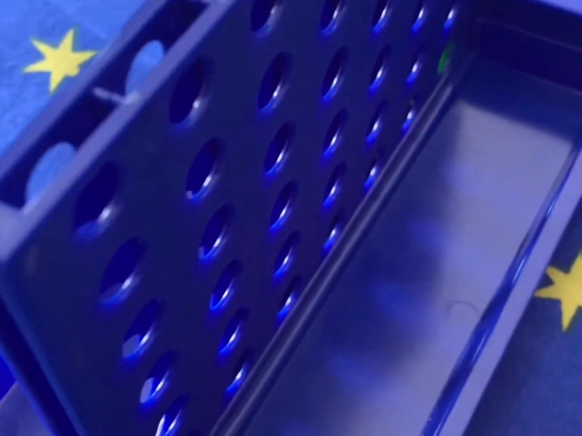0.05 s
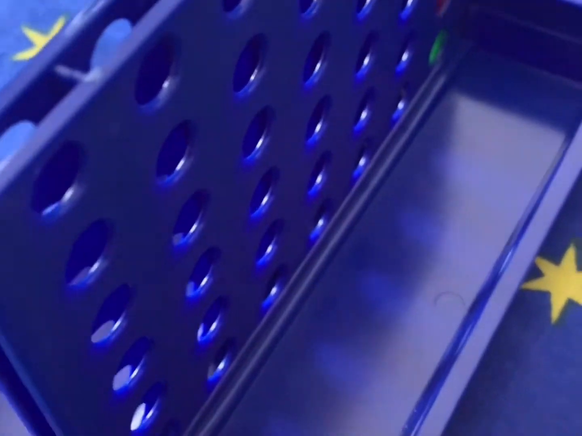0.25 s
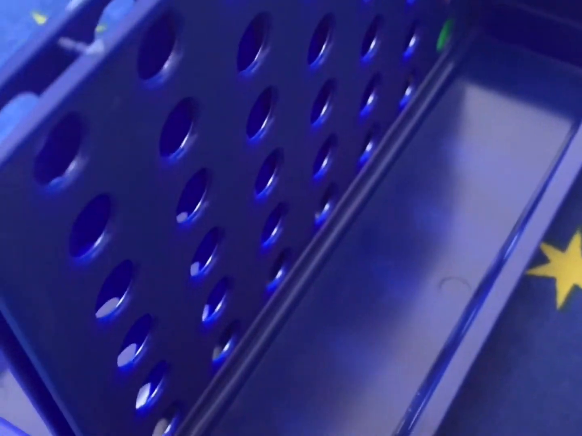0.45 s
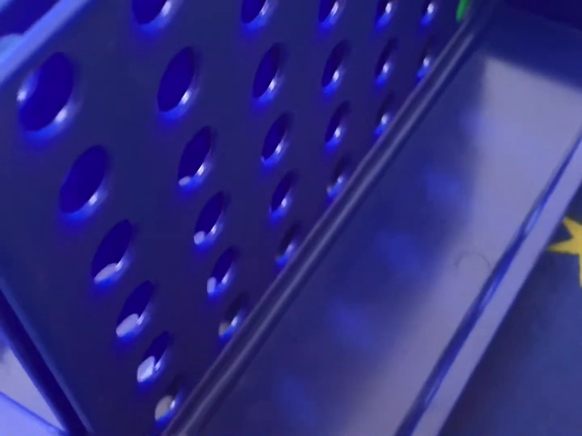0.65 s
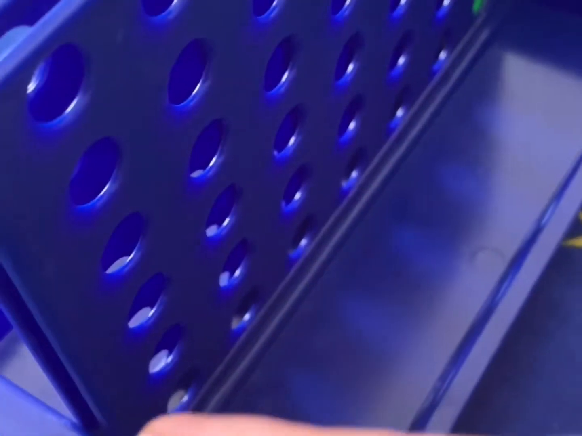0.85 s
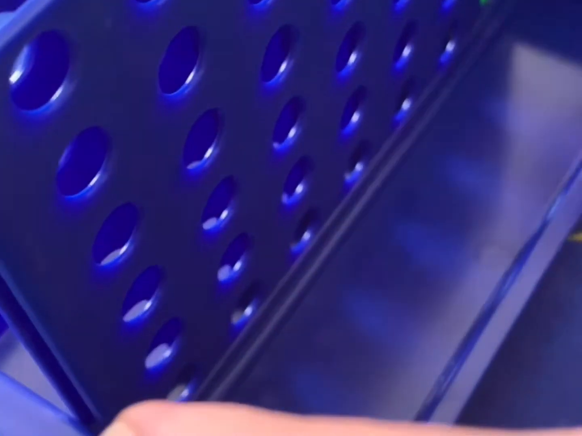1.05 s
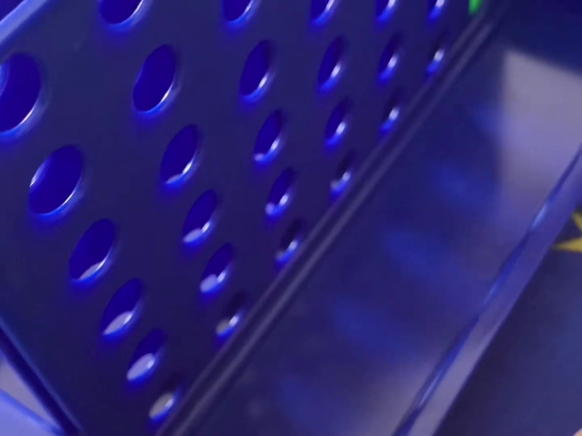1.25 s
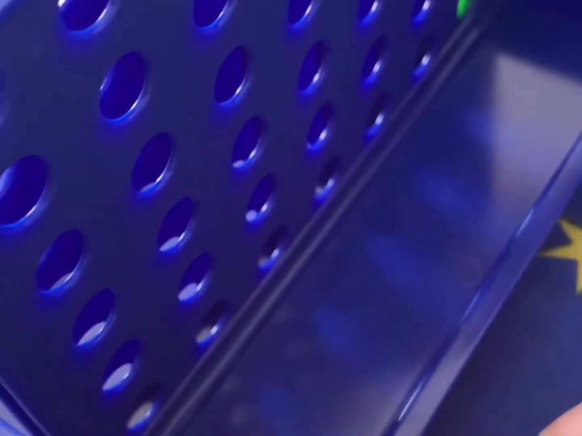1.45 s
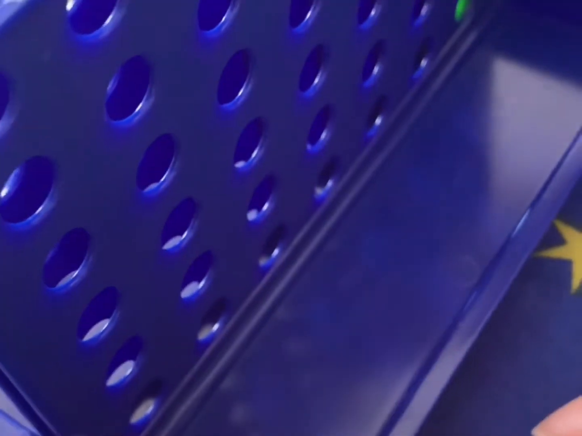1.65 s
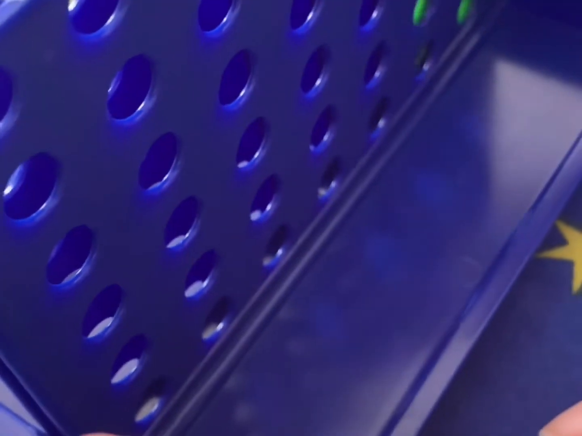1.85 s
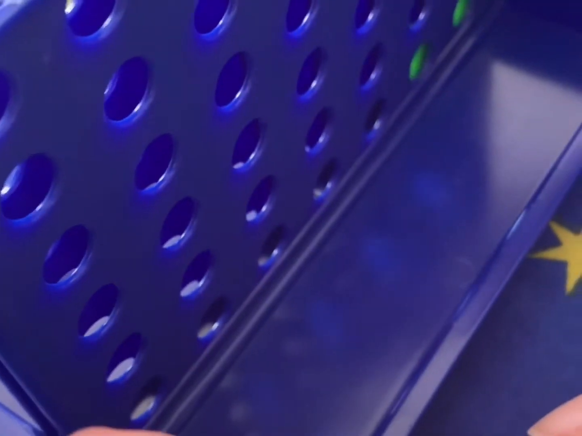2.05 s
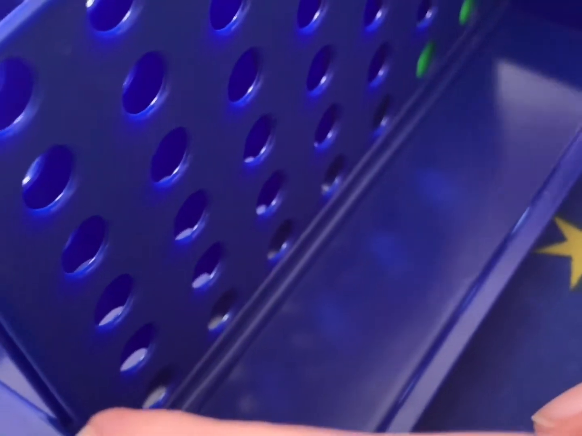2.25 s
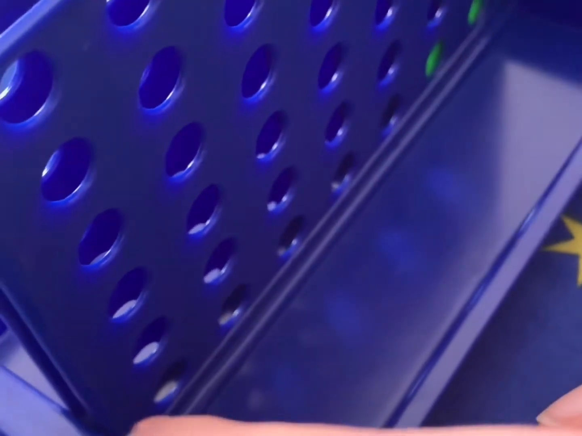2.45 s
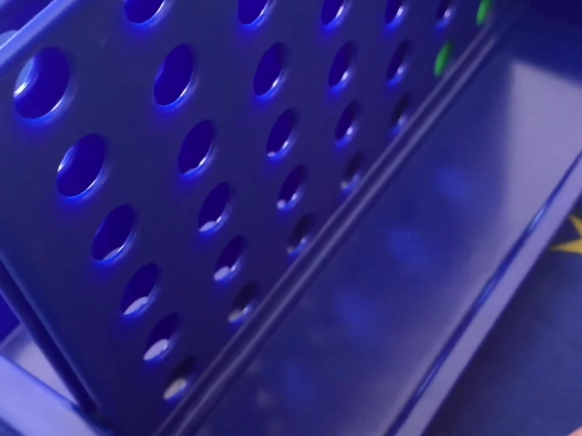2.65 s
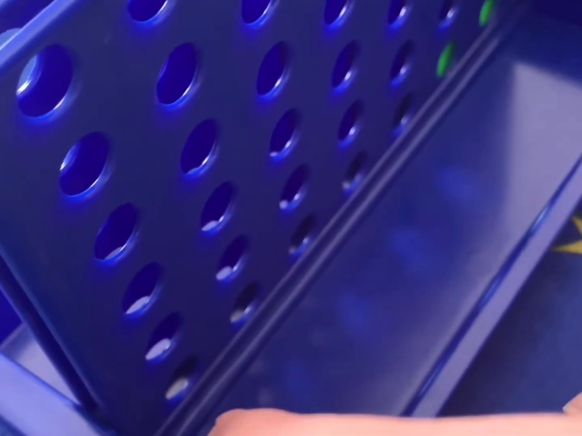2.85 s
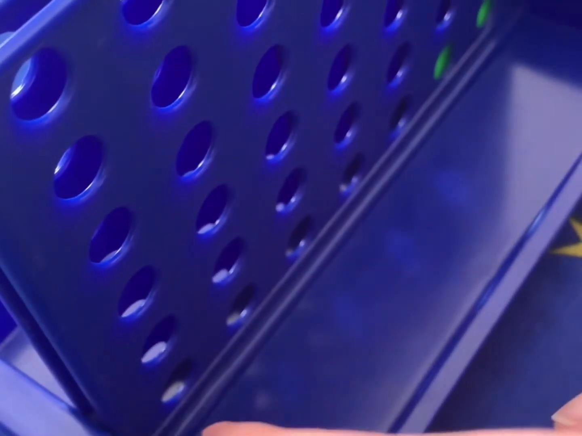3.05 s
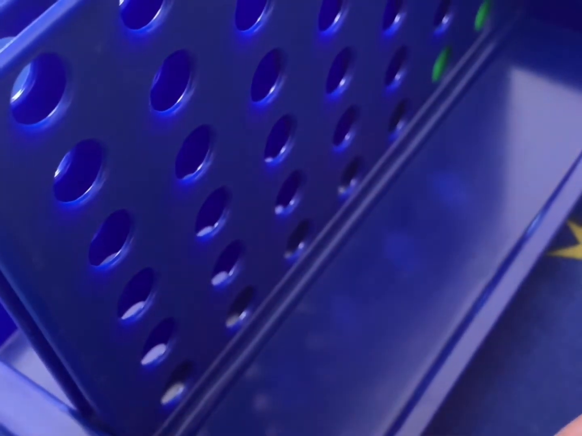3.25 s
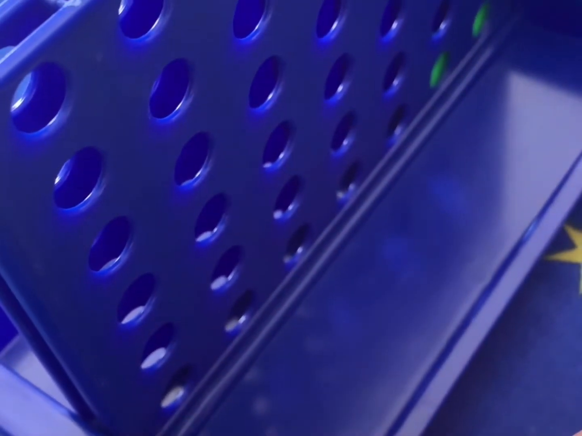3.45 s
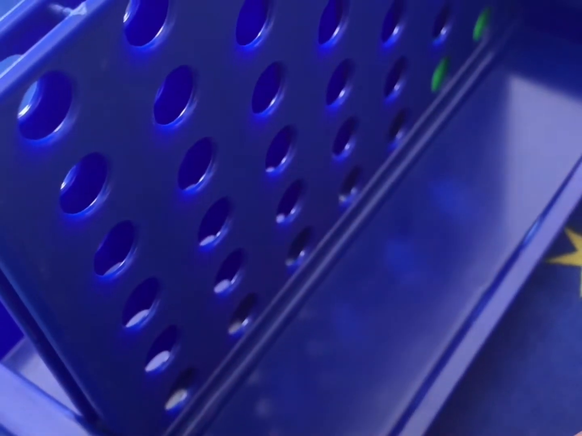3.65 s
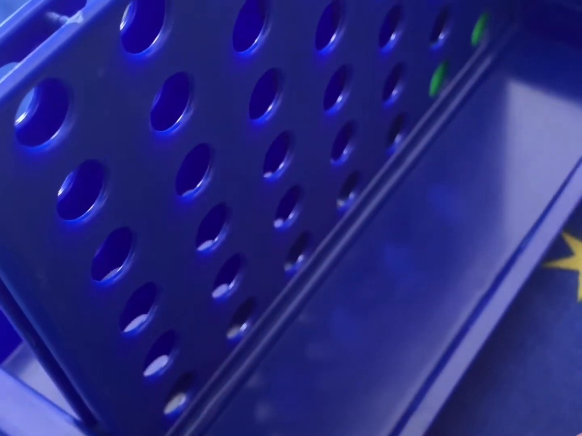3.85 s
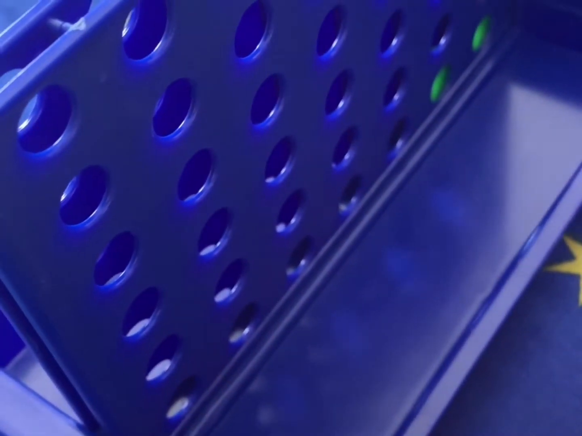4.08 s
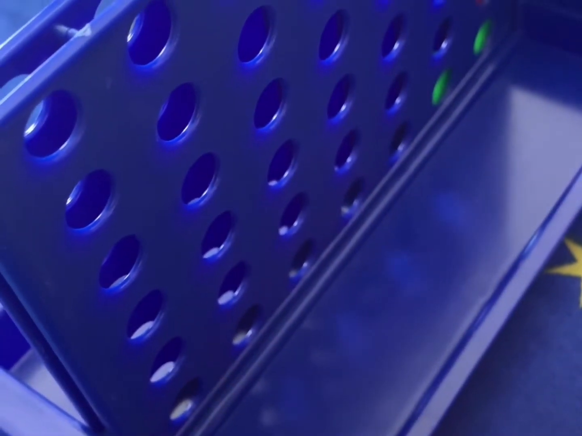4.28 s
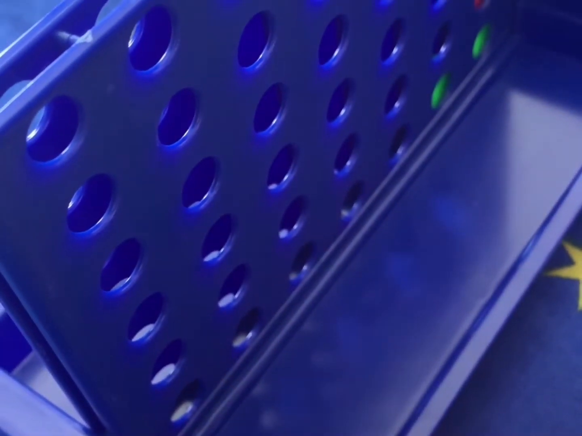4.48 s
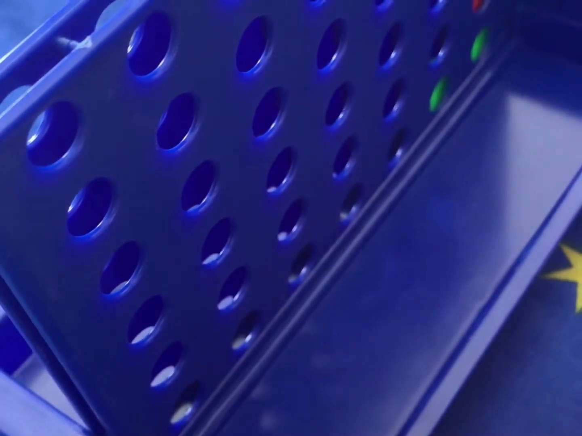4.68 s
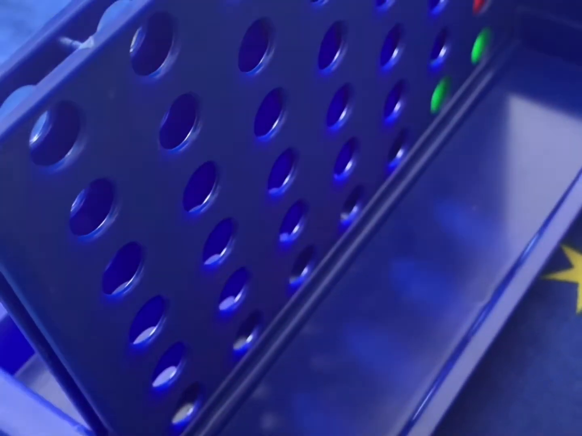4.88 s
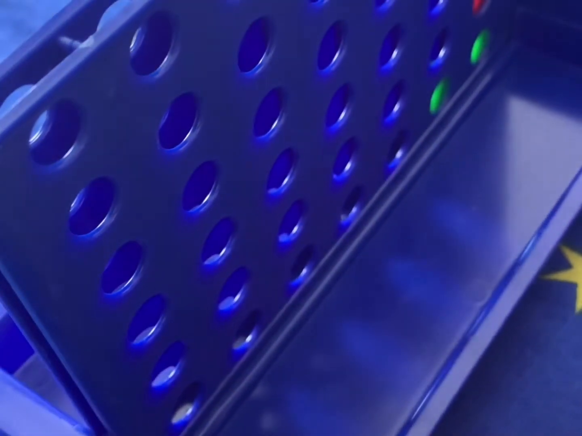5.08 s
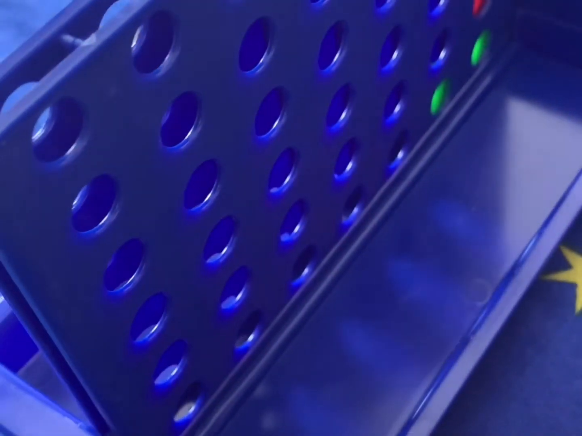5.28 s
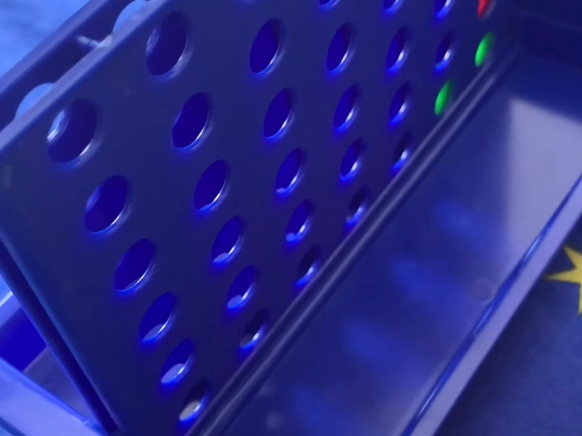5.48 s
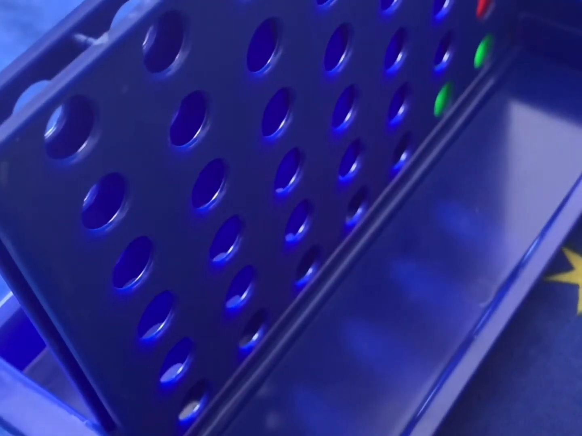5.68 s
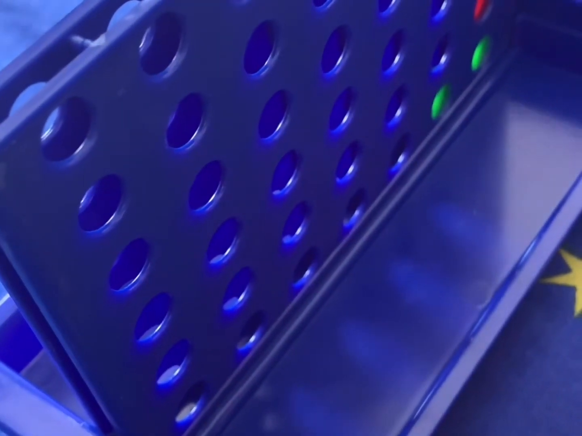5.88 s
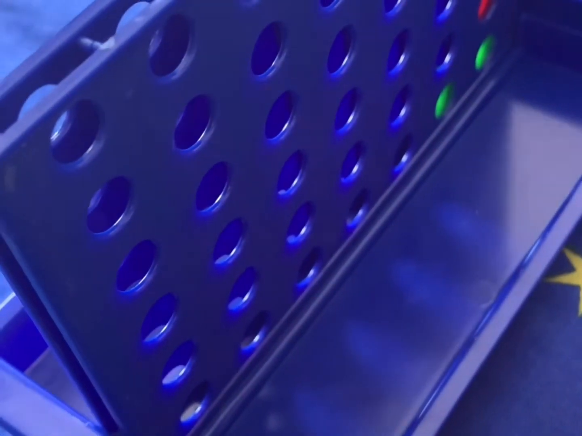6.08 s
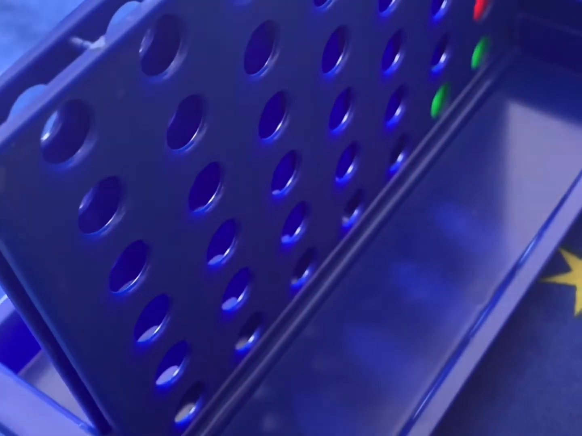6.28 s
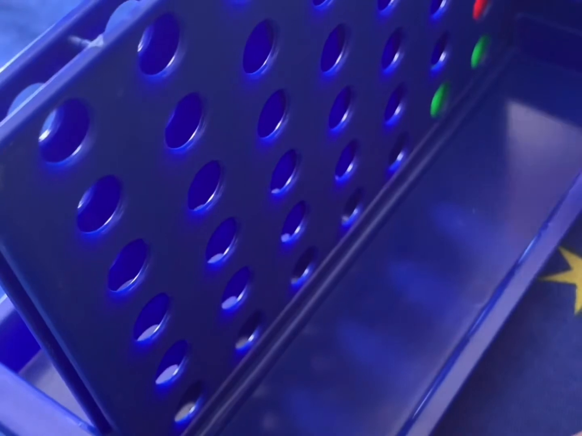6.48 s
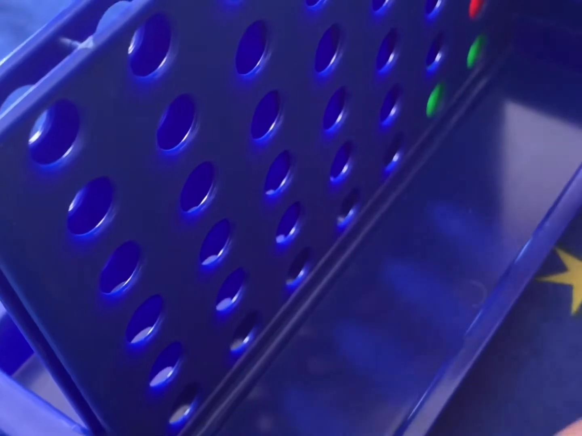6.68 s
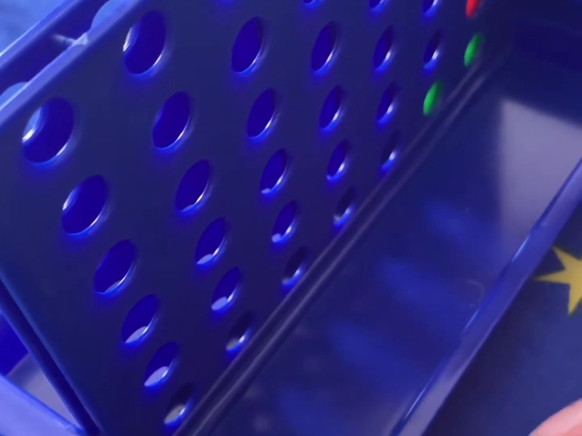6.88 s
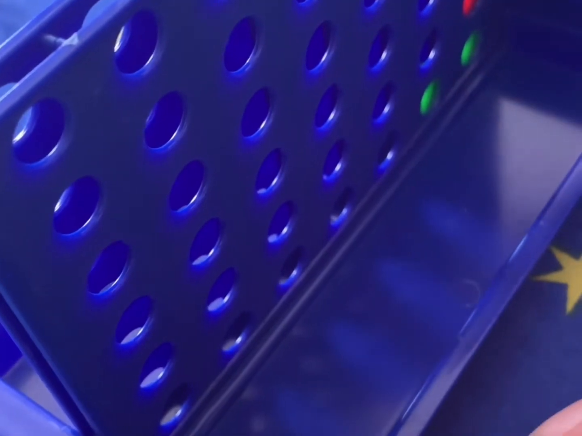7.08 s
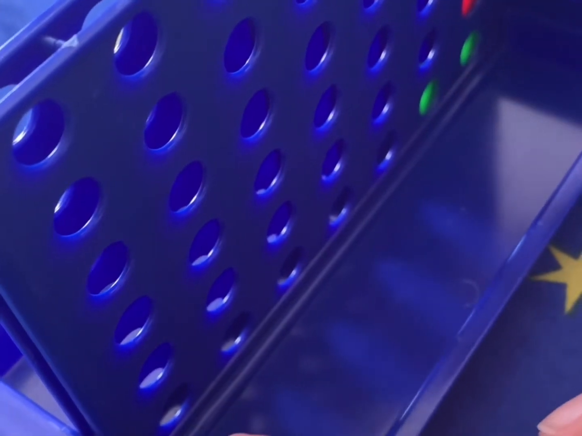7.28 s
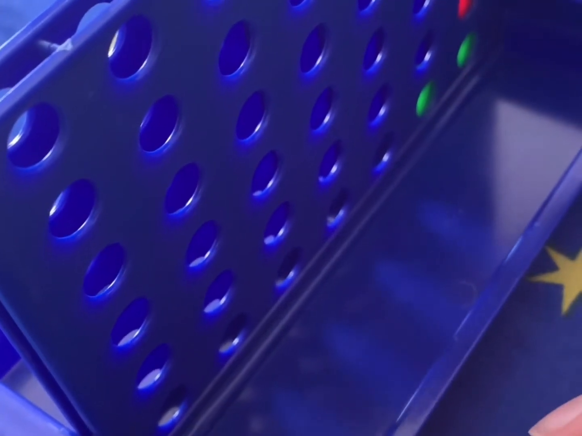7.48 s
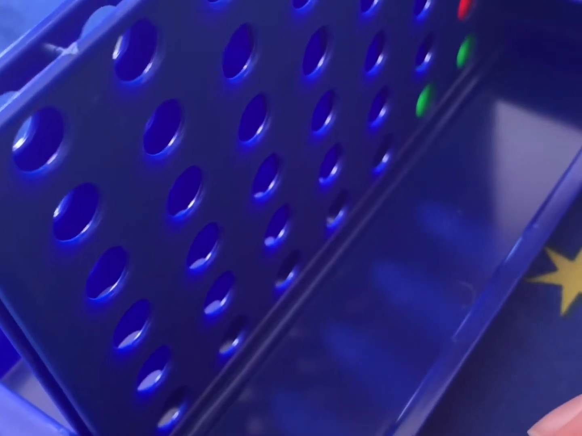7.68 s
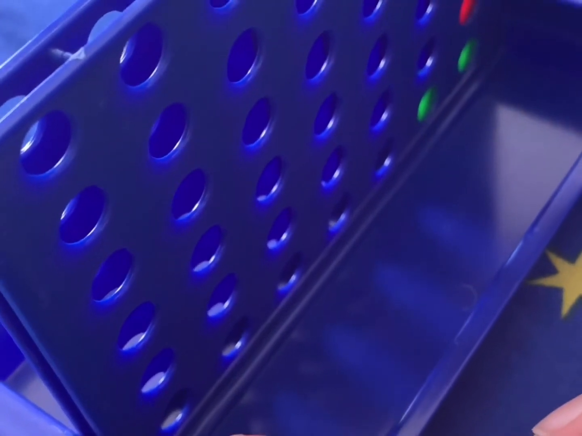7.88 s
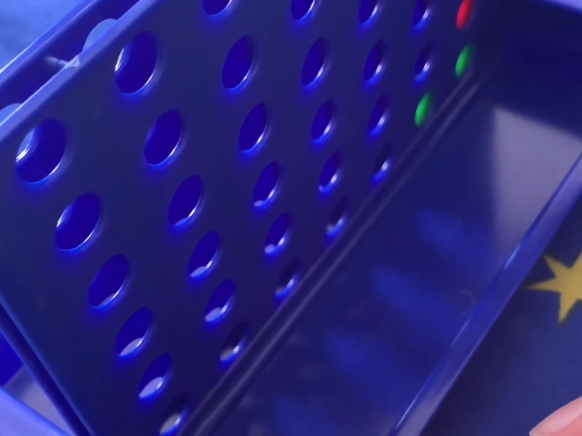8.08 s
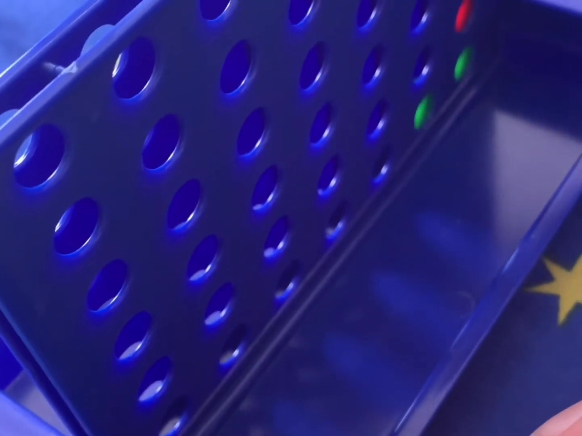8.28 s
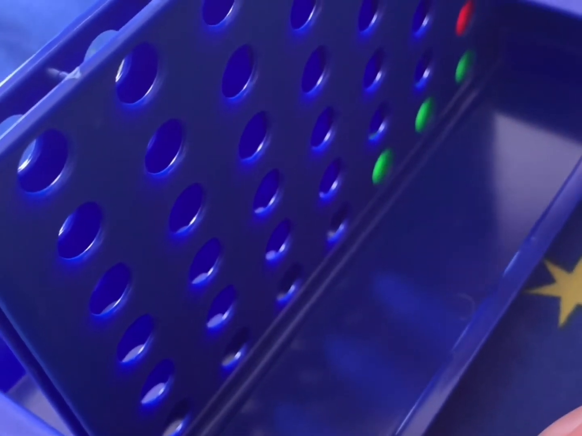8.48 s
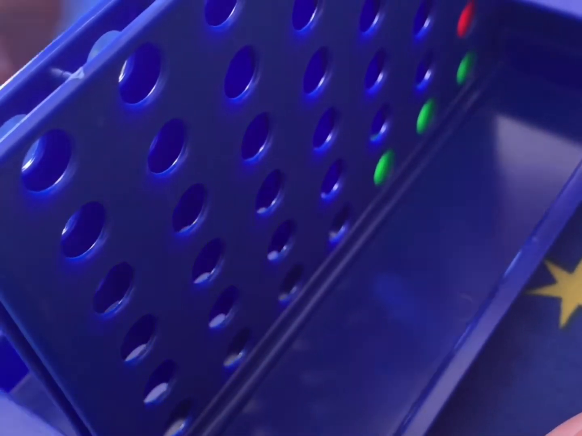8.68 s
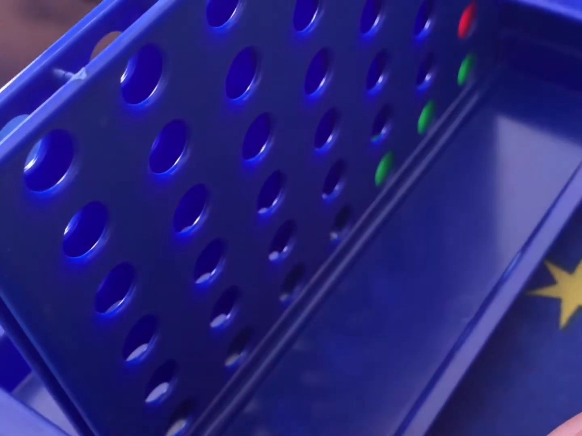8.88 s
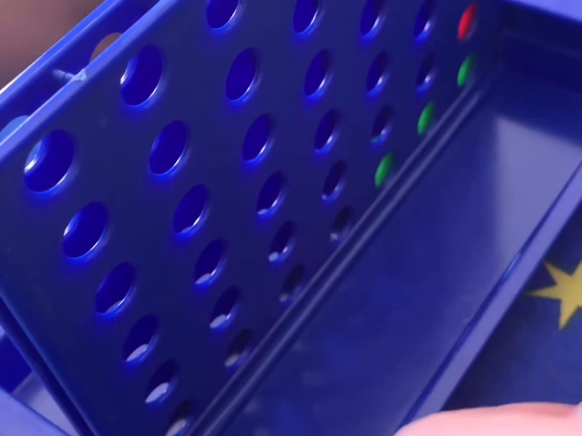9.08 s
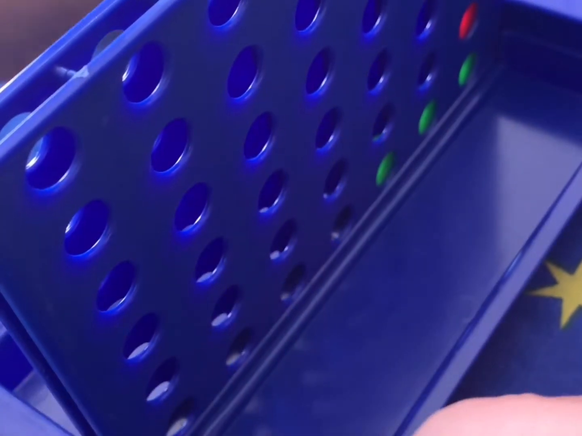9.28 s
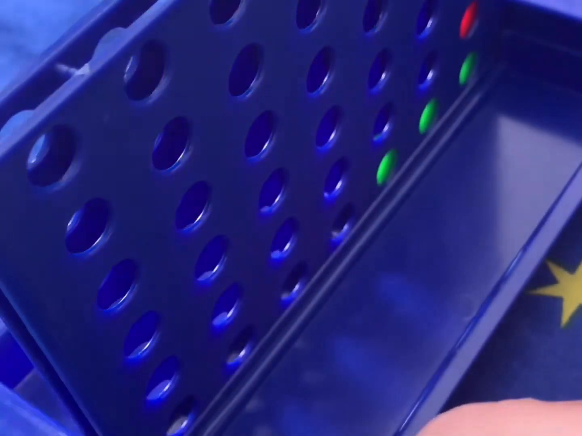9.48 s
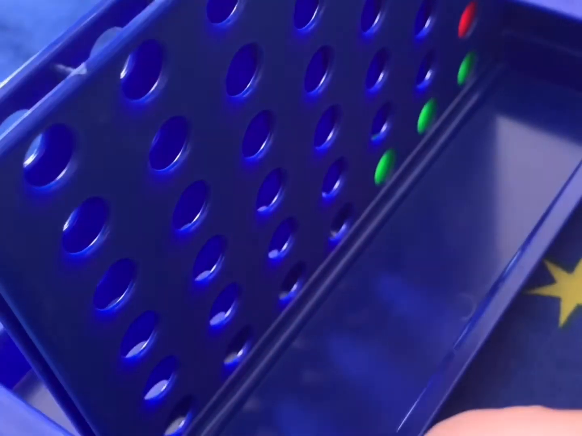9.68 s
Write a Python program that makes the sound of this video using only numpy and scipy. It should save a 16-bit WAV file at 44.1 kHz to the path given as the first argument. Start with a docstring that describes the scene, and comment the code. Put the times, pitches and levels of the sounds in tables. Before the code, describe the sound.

Very close in a small, soft room, light plastic discs drop into an upright plastic grid. One falls at once, another near two seconds, then others near six and eight and a half: a flick, hard clack, landing and quickening bounces. Between them come rim taps, short scrapes, tiny ticks and rubs on the hand-held camera, two faint bird whistles, low handling thumps and fading distant traffic.

```python
"""Plastic discs are fingered into the slots of an upright plastic grid, close to a hand-held camera in a small soft room.
At once a held disc taps and scrapes the rim, then the first disc drops: each fall is flick, strike, rebound, landing
and ever faster bounces, made by short contacts ringing damped modes, with friction noise for the slides between.
Tray knocks, a second fall, ticks, rubs and thumps of the camera case and two faint bird whistles follow, then more taps
and falls near six and eight seconds, and last stray ticks and knocks; rumble, fading traffic and hiss are shaped noise."""
import sys
import numpy as np
from scipy import signal
from scipy.fft import rfft, irfft, next_fast_len
from scipy.io import wavfile
from scipy.ndimage import map_coordinates

SR = 44100
rng = np.random.default_rng(int(sys.argv[2]) if len(sys.argv) > 2 else 0)


def generate_wav(sig):
    """Save sig (samples, or channels by samples) to the path in sys.argv[1] as 16-bit PCM at SR."""
    pcm = np.round(np.clip(np.atleast_2d(sig).T, -1, 1) * 32767).astype(np.int16)
    wavfile.write(sys.argv[1], SR, pcm)


N = 429093

# A disc falling down its slot. Each row: let go, strikes the wall, lands [s], first bounce's flight [s], ratio of
# each flight to the one before, at rest [s], then levels in dB: flick, strike, landing, loss a bounce,
# hollow knock, run-up, slide, settling.
FALLS = [(.1101, .1352, .195, .0283, .615, .287, -17, -5, -5, 7, -30, -27, -33, -29),
         (1.8653, 1.8822, 1.9606, .0328, .43, 2.04, -21.5, -7.5, -5, 5, -20, -25, -27, -31),
         (6.118, 6.1315, 6.1743, .0331, .4, 6.25, -36, -7, -13, 4, -31, -33, -31, -25),
         (8.3931, 8.4085, 8.4703, .0264, .53, 8.535, -15, -5.5, -5.5, 8, -15, -23, -26, -36)]
# A further touch of the wall. Each row: time in seconds, peak in dB, hollow knock in dB.
GLANCES = [(.164, -14, -25.5), (6.1854, -12.5, -36)]
# A held disc tapping the rim. Each row: time in seconds, peak in dB, flatness (0 edge-on, about 1 flat).
TAPS = [(.0054, -30.5, 0.77), (.075, -32, 0), (.0995, -30.5, 0), (1.3797, -27, 0.74), (1.387, -26.5, 0.95),
        (1.5305, -42.5, .9), (1.6393, -33, 0.77), (1.7556, -23.5, 0.27), (1.768, -27, 0.32),
        (1.8089, -27, 0), (1.8348, -33, .3), (2.1256, -39, 0.78), (5.1881, -14, 0.78), (5.5484, -34, 0.87),
        (5.674, -30.5, 0.86), (5.7941, -35, 1.05), (5.9676, -38, 0.4), (6.069, -27, 0.13),
        (6.095, -32, 0.55), (6.833, -25, 0.94), (7.0187, -24.5, 0.68), (7.101, -30, 0.97),
        (7.3231, -22.5, 0.75), (7.3886, -22, 0.56), (7.457, -36.5, 0.34), (7.5514, -38.5, 0.82),
        (7.832, -37.5, 0.8), (8.0016, -45, 1.08), (8.1224, -37.5, .9), (8.2203, -29, 0.5),
        (8.2809, -25, 0.68), (8.326, -24.5, 0.04), (8.3396, -31, 0), (8.3542, -23, .02),
        (8.3654, -22.5, 0.06), (8.3806, -19, 0.4)]
# A held disc scraping the rim. Each row: start in seconds, length in seconds, level in dB.
SCRAPES = [(.056, .12, -43), (1.37, .034, -55), (1.52, .037, -53), (1.73, .087, -47.5), (2.24, .2, -68),
           (3.76, .09, -62), (4.5, .1, -66), (4.93, .13, -68), (5.2, .088, -50), (5.322, .13, -48.5),
           (5.635, .19, -59.5), (5.95, .11, -48.5), (6.53, .11, -62.5), (7.03, .11, -50.5),
           (7.33, .045, -40.5), (7.4, .19, -60), (7.77, .054, -56.5), (7.91, .087, -62), (8.05, .089, -46),
           (6.66, .15, -70), (9.14, .052, -69), (9.37, .15, -72.5)]
# A fingertip knocking the tray. Each row: time in seconds, peak in dB, hollow knock in dB, treble in dB.
KNOCKS = [(0.651, -36.5, -1, 1.5), (5.074, -44, -33, -18.5), (7.703, -46.5, -14, -17.5),
          (8.914, -52, -3.5, -32), (9.136, -40, -11, -3.5), (9.561, -50, -37.5, -16),
          (9.6146, -41, -41, -18), (9.6247, -47, -35, -13), (9.649, -54.5, -38, -25)]
# Modes of the grid, of a disc against the rim, and of the tray. Each row: frequency in Hz, relative level in dB.
GRID_MODES = [(300, -10.5), (455, 2.5), (545, 10), (900, 3.5), (1060, 3.5), (1500, 0), (1787, -3),
              (2487, -2), (2928, -1), (3488, -3.5), (3800, -4.5), (4155, -5.5), (4931, -6), (5297, -1.5),
              (6018, 4.5), (6890, 3), (7200, 5), (7999, 3.5), (8516, 5.5), (8796, 1), (9700, 0.5),
              (10325, -0.5), (11200, -3), (13300, -3.5), (14685, -14.5), (15600, -13)]
RIM_MODES = [(300, -4), (430, 3.5), (780, -12), (925, 2), (1400, -3.5), (1636, -8), (2150, -17.5),
             (2600, -11.5), (2906, -6), (3262, -4), (3560, 0.5), (4166, -5), (4834, -20.5), (5178, -5.5),
             (6309, 2), (7170, 0.5), (8107, 2.5), (9022, -6.5), (9733, -2), (12306, -11), (15202, -14.5)]
TRAY_MODES = [(400, 8.5), (770, 9), (1150, 7.5), (1550, 1), (2050, -7), (2600, -7), (7000, -6.5),
              (12000, -13.5)]

# The camera case ticking under the fingers. Each row: time in seconds, peak in dB.
TICKS = [(.7682, -46), (1.064, -49), (2.1651, -24.5), (2.5078, -46.5), (2.591, -25), (2.598, -31.5),
         (2.604, -29), (2.6314, -31), (2.637, -30), (2.6955, -19.5), (2.7346, -33), (2.817, -56.5),
         (3.077, -55), (3.1231, -40), (3.7564, -36.5), (3.7734, -42), (3.792, -32), (3.8148, -25.5),
         (3.8323, -33.5), (3.936, -54.5), (3.988, -51), (4.0099, -42.5), (4.0821, -53), (4.4268, -39),
         (4.7117, -39), (4.7162, -35.5), (4.7342, -41), (4.749, -30), (4.797, -30), (4.816, -38.5),
         (4.843, -41), (4.971, -54.5), (5.132, -40.5), (5.1446, -43), (5.1732, -35), (5.2882, -45.5),
         (5.5036, -41), (5.521, -37), (6.0343, -43), (8.584, -50), (9.098, -48.5), (9.6143, -36)]
# Top ring of a full-scale tick as the grip moves. Each row: time in seconds, level in dB.
TICK_TOP = [(1, -3), (2.6, -6.5), (3.9, -6), (4.7, -6.5), (5.15, -12.5), (5.5, -4.5), (9.6, -13)]
# Skin rubbing the camera case. Each row: start in seconds, length in seconds, level in dB.
RUBS = [(2.288, 0.29, -58.5), (2.58, 0.14, -44.5), (2.687, 0.09, -50.5), (2.902, 0.27, -61),
        (3.726, 0.18, -59), (4.521, 0.06, -62), (4.72, .18, -49)]
# Modes of the camera case. Each row: frequency in Hz, relative level in dB.
CASE_MODES = [(3300, -21), (5400, -14.5), (6400, -14), (7800, -18.5), (9400, -11.5), (11600, -6),
              (12400, -3.5), (13684, 1), (14800, -15.5)]
# Fingers shifting on the camera. Each row: start in seconds, relative level in dB.
BUMPS = [(1.388, -35), (1.493, -40), (1.625, -37), (2.074, -42.5), (2.587, -37), (5.19, -34), (5.887, -43),
         (6.128, -37.5), (6.832, -43), (7.021, -43.5), (7.178, -49), (7.346, -35), (7.704, -37.5),
         (7.776, -37.5), (8.404, -46)]
# A distant bird. Each row: start in seconds, length in seconds, settled pitch in Hz, initial level in dB.
BIRD = [(3.495, 0.082, 4330, -71), (3.6, 0.047, 4400, -85)]
# Low rumble of the hand. Each row: time in seconds, mean level in dB.
HANDLING = [(0.0, -47), (0.97, -61.5), (1.49, -57), (5.01, -62.5), (5.12, -59.5), (9.73, -63.5)]
# Traffic. Each row: time in seconds, mean drone level in dB, mean tyre hiss level in dB.
ROAD = [(0.0, -60.5, -61.5), (0.89, -65, -70), (9.73, -78.5, -84)]
# Spectra of the hand rumble, the traffic drone, the tyre hiss and the microphone noise.
# Each row: frequency in Hz, relative density in dB.
THUMP_SPECTRUM = [(8.8, -24.5), (15, 6), (65, -1), (97, 3), (135, -14), (200, -15.5), (260, -36),
                  (440, -120)]
DRONE_SPECTRUM = [(71, -31.5), (120, -9), (135, -12), (183, 2), (387, -12.5), (600, -18.5), (780, -51),
                  (1320, -120)]
TYRE_SPECTRUM = [(240, -42), (400, -10), (1120, -2), (1940, -13.5), (2280, -28.5), (2480, -22),
                 (3500, -31.5), (4550, -62), (7700, -120)]
HISS_SPECTRUM = [(1000, -0.5), (4000, 4), (12000, 0), (14300, -7), (15200, -17.5)]

# Decay of the room. Each row: frequency in Hz, time to fall 60 dB in seconds.
ROOM_DECAY = [(300, 0.06), (2000, 0.12), (8000, 0.08), (15000, 0.013)]
# Lead of the left channel over the right. Each row: frequency in Hz, phase in radians.
LEAD = [(0, 0), (1500, .15), (2700, 1.2), (4800, 3.14), (6900, 6.28), (11100, 12.57), (17200, 21.7)]
# The microphone's top end. Each row: frequency in Hz, gain in dB.
ROLL_OFF = [(15600, 3), (16100, -19), (17100, -41.5)]
TOP_HZ = 17150

# Treble of the flick, of strike and landing, and of rebounds, bounces and glances [dB]
LET_GO_TREBLE_DB, HARD_TREBLE_DB, SOFT_TREBLE_DB = 6.5, -10, -17.5
RUN_UP_TREBLE_DB, SLIDE_TREBLE_DB, SETTLE_TREBLE_DB, SCRAPE_TREBLE_DB = 1, -6.5, -9, -10
REBOUND_S, REBOUND_DB = .0155, -12  # off the opposite wall: delay after the strike, level relative to it
# Edge-on taps are thin, flat ones hollow
EDGE_KNOCK_DB, FLAT_KNOCK_DB, EDGE_TREBLE_DB, FLAT_TREBLE_DB = -43.5, -14, 2, -16
TICK_TOP_GROWS = 0.31  # dB of top ring lost per dB of a weaker tick
RUB_TREBLE_DB, RUB_TREBLE_GROWS = 23.5, 0.87  # treble of a 0 dB rub, and dB gained per dB of harder rubbing


def fall_events():
    """Restitution: each bounce keeps a fixed share of the last flight, giving blows and strokes for every fall."""
    # Blows are (s, dB, knock dB, treble dB); strokes are (s, length s, dB, treble dB)
    hits = [(*row, SOFT_TREBLE_DB) for row in GLANCES]
    run_ups, slides = [], []
    for (go_s, wall_s, land_s, flight_s, shrink, rest_s,
         go_db, wall_db, land_db, loss_db, knock, run_db, slide_db, settle_db) in FALLS:
        hits += [(go_s, go_db, knock, LET_GO_TREBLE_DB),
                 (wall_s, wall_db, knock, HARD_TREBLE_DB),
                 (wall_s + REBOUND_S, wall_db + REBOUND_DB, knock, SOFT_TREBLE_DB),
                 (land_s, land_db, knock, HARD_TREBLE_DB)]
        for k in (1, 2, 3):
            bounce_s = land_s + flight_s * (1 - shrink ** k) / (1 - shrink)  # sum of the flights so far
            hits.append((bounce_s, land_db - loss_db * k, knock, SOFT_TREBLE_DB))
        run_ups.append((go_s, wall_s - go_s, run_db, RUN_UP_TREBLE_DB))
        slides += [(wall_s, land_s - wall_s, slide_db, SLIDE_TREBLE_DB),
                   (land_s, rest_s - land_s, settle_db, SETTLE_TREBLE_DB)]
    return hits, run_ups, slides


def falling_discs():
    """Impact and sliding friction both excite the grid's modes as the discs fall."""
    hits, run_ups, slides = fall_events()
    drops = blows(hits, strike_colours(hits), GRID_MODES, loss_hz=22, scatter_db=2, crack_db=-15.5,
                  contact_s=0.0034, rise_s=0.0015)
    sliding = friction(slides, GRID_MODES, loss_hz=44.5, corner_hz=4678, grain_db=3.0, rise=0.089, fall=.8)
    # The scrape swells into the strike
    running = friction(run_ups, GRID_MODES, loss_hz=44.14, corner_hz=4700, grain_db=1, rise=1.0, fall=.08)
    return drops + sliding + running


def rim_taps():
    """Contact geometry: a disc meeting the rim flat drives low modes, one meeting it edge-on drives high modes."""
    held = []
    for s, db, flat in TAPS:
        knock = EDGE_KNOCK_DB + flat * (FLAT_KNOCK_DB - EDGE_KNOCK_DB)
        treble = EDGE_TREBLE_DB + flat * (FLAT_TREBLE_DB - EDGE_TREBLE_DB)
        held.append((s, db, knock, treble))
    return blows(held, strike_colours(held), RIM_MODES, loss_hz=28.3, scatter_db=3.5, crack_db=-11.0,
                 contact_s=0.011, rise_s=0.0011)


def tray_knocks():
    """A longer contact of the fingertip excites the strongly damped modes of the tray."""
    return blows(KNOCKS, strike_colours(KNOCKS), TRAY_MODES, loss_hz=60, scatter_db=3.0, crack_db=-3,
                 contact_s=0.049, rise_s=0.001675)


def rim_scrapes():
    """Sliding friction of a held disc excites the rim modes."""
    strokes = [(*row, SCRAPE_TREBLE_DB) for row in SCRAPES]
    return friction(strokes, RIM_MODES, loss_hz=62, corner_hz=4600, grain_db=1.0, rise=0.17, fall=0.52)


def case_ticks():
    """Very short contacts excite the high modes of the camera's shell; stronger ticks ring brighter."""
    colours = []
    for s, db in TICKS:
        top_db = np.interp(s, *np.transpose(TICK_TOP)) + TICK_TOP_GROWS * db
        colours.append([(1500, -19.5), (4000, -14.5), (9000, -8), (11000, top_db)])
    return blows(TICKS, colours, CASE_MODES, loss_hz=36, scatter_db=2, crack_db=-8, contact_s=.002, rise_s=.0004)


def case_rubs():
    """Skin friction drives the shell's modes, with more treble the harder the rub."""
    strokes = [(s, length, db, RUB_TREBLE_DB + RUB_TREBLE_GROWS * db) for s, length, db in RUBS]
    return friction(strokes, CASE_MODES, loss_hz=160, corner_hz=8200, grain_db=5.5, rise=0.17, fall=0.83)


def bumps():
    """Transient oscillation: each shift of the grip is one soft low swing of the camera body that swells and dies."""
    out, t = np.zeros(N + SR), np.arange(SR // 8) / SR
    for s, db in BUMPS:
        hz = 62 * amp(1.9 * rng.standard_normal())
        swell = (t / 0.029 * np.exp(1 - t / 0.019)) ** 2
        out[round(s * SR):][:len(t)] += amp(db) * swell * np.sin(2 * np.pi * hz * t)
    return out[:N]


def bird():
    """Frequency modulation: thin wavering whistles glide down at the onset, with a fast-fading octave overtone."""
    out, waver = np.zeros(N), wobble(97)
    for s, length, hz, db in BIRD:
        t = np.arange(round(length * SR)) / SR
        start = round(s * SR)
        pitch = hz * (1 + 0.017 * np.exp(-t / .02) + 0.016 * waver[start:][:len(t)])
        phase = 2 * np.pi * np.cumsum(pitch) / SR
        tone = np.sin(phase) + amp(-5.0 - 60 * t / 0.24) * np.sin(2 * phase)
        envelope = amp(db - 15 * t / length) * (1 - np.exp(-t / 0.0043))
        out[start:][:len(t)] += envelope * tone
    return out


def background():
    """Superposed noise: hand rumble and traffic drone of shared unsteadiness, tyre hiss, microphone hiss; and bumps."""
    drone_db, tyre_db = curves(ROAD)
    lumps_db = 2.5 * wobble(14)
    hand = amp(curves(HANDLING)[0] + lumps_db) * noise(THUMP_SPECTRUM, alike=.999)
    drone = amp(drone_db + lumps_db) * noise(DRONE_SPECTRUM, alike=0.76)
    tyres = amp(tyre_db + wobble(3.3)) * noise(TYRE_SPECTRUM, alike=0.085)
    return hand + bumps() + drone + tyres + amp(-83) * noise(HISS_SPECTRUM, alike=0.94)


def room(x):
    """Reverberation: each frequency of the room's answer dies at its own speed, differently at each ear."""
    hz, t, z = signal.stft(rng.standard_normal((2, SR // 2)), SR, nperseg=256)
    decay = amp(-60 * t / along(ROOM_DECAY, hz)[:, None])
    tail = signal.istft(z * decay, SR, nperseg=256)[1]
    late = np.pad(x, (100, 0))[None]  # the answer starts 100 samples after the source
    return signal.fftconvolve(late, tail / np.linalg.norm(tail[0]), axes=1)[:, :N]


def strike_colours(events):
    """Spectral weighting of each impact: hollow knock below about 1100 Hz, treble above 5500 Hz."""
    return [[(1100, knock), (1900, -5.0), (4300, -3), (5500, treble)] for _, _, knock, treble in events]


def blows(events, colours, modes, loss_hz, scatter_db, crack_db, contact_s, rise_s):
    """Impact excitation: a short chattering contact rings every mode at a new strength and is itself heard as a crack."""
    out, t = np.zeros(N + SR), np.arange(4096) / SR
    hz, mode_db = np.transpose(modes)[:, :, None]
    bins = np.fft.rfftfreq(len(t), 1 / SR)
    # The edge grazes, then strikes; after the rise the driving force and the crack each fall 60 dB in their own time
    fade = amp(-60 * np.maximum(t - rise_s, 0) / [[contact_s], [.012]])
    press = np.minimum(t / rise_s, 1) ** 3 * fade
    taper = np.cos(t / t[-1] * np.pi / 2)
    for (s, db, *_), colour in zip(events, colours):
        chance = rng.standard_normal((2, len(modes), 1))
        force, chatter = rng.standard_normal((2, len(t))) * press
        level_db = mode_db + along(colour, hz) + scatter_db * chance[1]
        ring = resonances(hz * (1 + 0.016 * chance[0]), level_db, damping(hz, loss_hz))
        crack = amp(crack_db + along(colour, bins) + along(modes, bins))
        hit = irfft(rfft(force) * ring(bins) + rfft(chatter) * crack) * taper
        out[round(s * SR):][:len(t)] += amp(db) * hit / np.abs(hit).max()
    return out[:N]


def friction(strokes, modes, loss_hz, corner_hz, grain_db, rise, fall):
    """Friction excitation: lumpy noise drives the modes, the lowest hardly; each stroke has its own share of treble."""
    hz, mode_db = np.transpose(modes)[:, :, None]
    grid_hz = np.arange(0, SR / 2, 5)
    drive_db = along([(500, -26), (1600, 0)], hz)
    ring = resonances(hz, mode_db + drive_db, damping(hz, loss_hz))(grid_hz)
    grit = rng.standard_normal(N) * amp(grain_db * wobble(350))
    body = unit(filtered(grit, lambda f: np.interp(f, grid_hz, np.abs(ring))))
    top = filtered(body, lambda f: 1 / (1 + (corner_hz / (f + 1)) ** 6))
    low, high = np.zeros(N), np.zeros(N)
    for s, length, db, treble_db in strokes:
        u = np.linspace(0, 1, round(length * SR))  # share of the stroke done
        shape = amp(db) * (1 - np.exp(-u / rise)) * (1 - u) ** fall
        low[round(s * SR):][:len(u)] += shape
        high[round(s * SR):][:len(u)] += shape * amp(treble_db)
    return low * (body - top) + high * top


def damping(hz, loss_hz):
    """Damping of plastic: mode width in Hz is a base from the loose joints plus a loss, loss_hz at 1 kHz, rising with pitch."""
    return 22 + loss_hz * (hz / 1000) ** 0.63


def resonances(hz, db, width):
    """Modal superposition: causal response of modes given as columns; neighbours swing in opposition."""
    sign = (-1) ** np.arange(len(hz))[:, None]
    return lambda f: np.sum(sign * amp(db) * 1j * f * width / (hz * hz - f * f + 1j * f * width), 0)


def noise(spectrum, alike):
    """Partial coherence: stereo noise of rms 1 whose channels have the correlation alike."""
    a, b = filtered(rng.standard_normal((2, N)), lambda hz: amp(along(spectrum, hz)))
    turn = np.arccos(np.clip(alike, -1, 1)) / 2
    shared, opposed = np.cos(turn) * a, np.sin(turn) * b
    return unit(np.array([shared + opposed, shared - opposed]))


def filtered(x, response):
    """Linear filtering: the spectrum of x times a complex response of frequency."""
    m = next_fast_len(N + SR // 2)
    return irfft(rfft(x, m) * response(np.fft.rfftfreq(m, 1 / SR)), m)[..., :N]


def wobble(rate):
    """Slow random fluctuation: a smooth curve through rate random knots a second."""
    knots = rng.standard_normal(int(N * rate / SR) + 4)
    return map_coordinates(knots, [np.arange(N) * rate / SR])


def curves(rows):
    """Linear interpolation in time: one value per sample for each column after the time."""
    s, *cols = np.transpose(rows)
    return [np.interp(np.arange(N) / SR, s, c) for c in cols]


def along(points, hz):
    """Interpolation of (Hz, value) points on a logarithmic frequency axis."""
    f, v = np.transpose(points)
    return np.interp(np.log(hz + 1), np.log(f + 1), v)


def unit(x):
    """Normalization to rms 1."""
    return x / np.sqrt(np.mean(x ** 2) + 1e-20)


def amp(db):
    """Amplitude ratio of a level in dB."""
    return 10 ** (np.asarray(db) / 20)


def scene():
    """Direct and reverberant sound of discs, case and bird add to the background."""
    discs = falling_discs() + rim_taps() + tray_knocks() + rim_scrapes()
    near = discs + case_ticks() + case_rubs() + bird()
    return near + amp(-9.5) * room(near) + background()


def record(dry):
    """Interchannel phase grows towards the treble, the left is weaker in the bass; nothing passes above the band limit."""
    lead = lambda hz: .5j * np.interp(hz, *np.transpose(LEAD)) * [[1], [-1]]
    tilt_db = lambda hz: along([(60, .2), (200, .7), (1500, .3), (3500, 0)], hz) * [[-1], [1]]
    return filtered(dry, lambda hz: np.exp(lead(hz)) * amp(along(ROLL_OFF, hz) + tilt_db(hz)) * (hz < TOP_HZ))


dry = scene()
out = record(dry)
generate_wav(out)
```